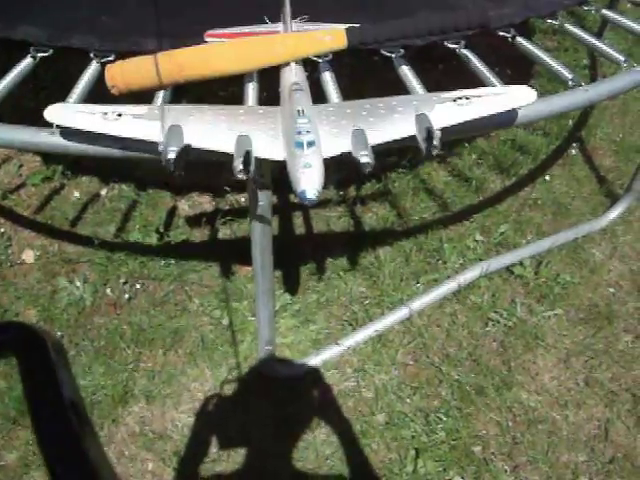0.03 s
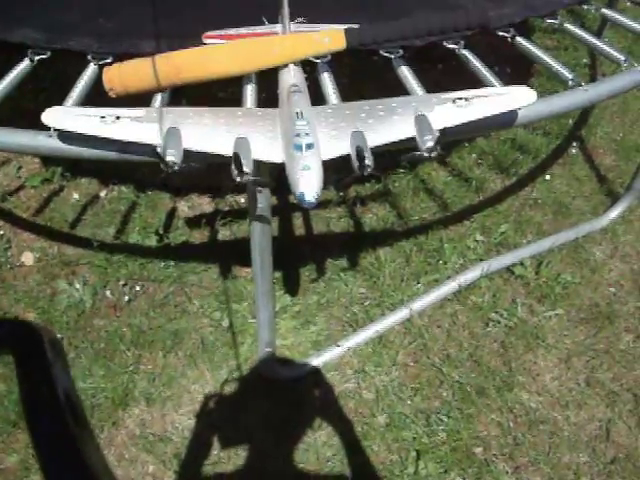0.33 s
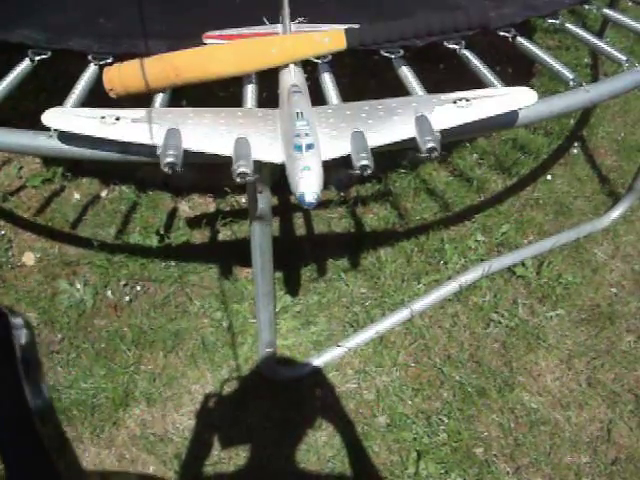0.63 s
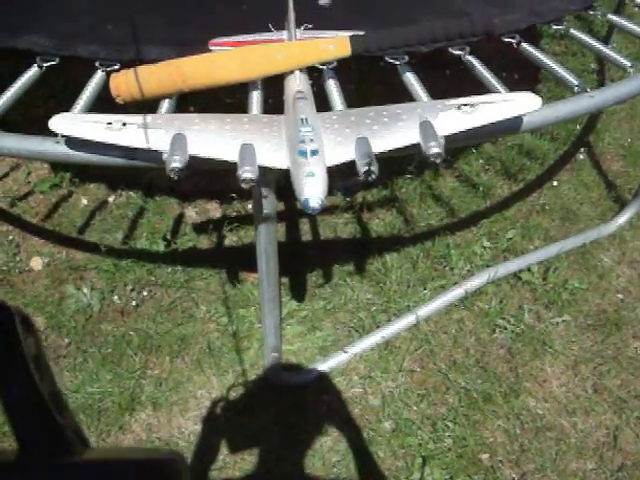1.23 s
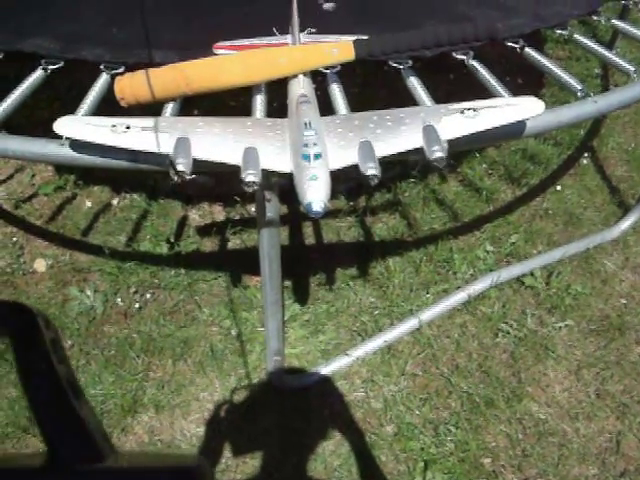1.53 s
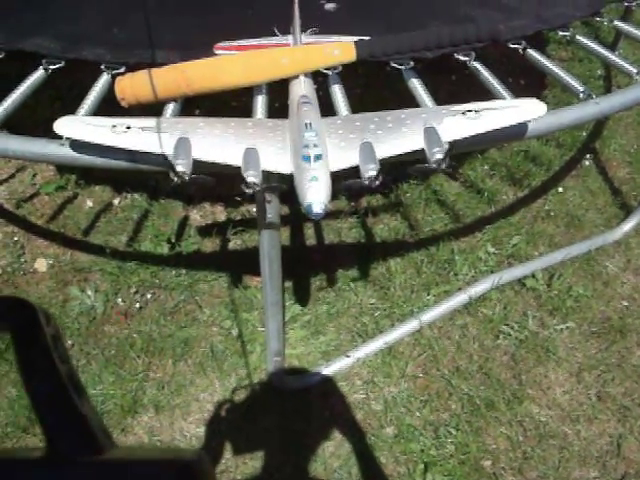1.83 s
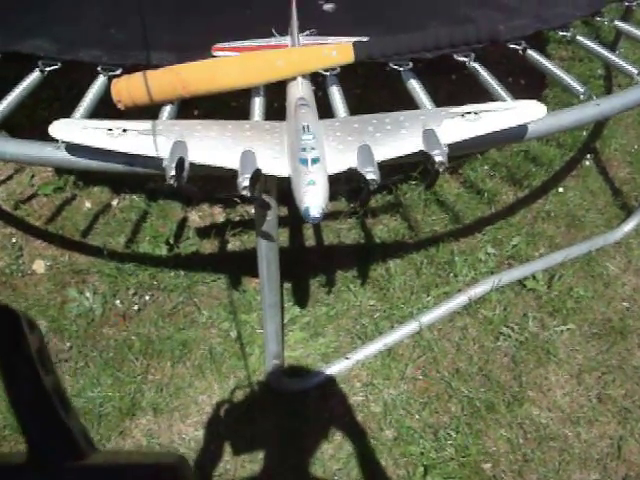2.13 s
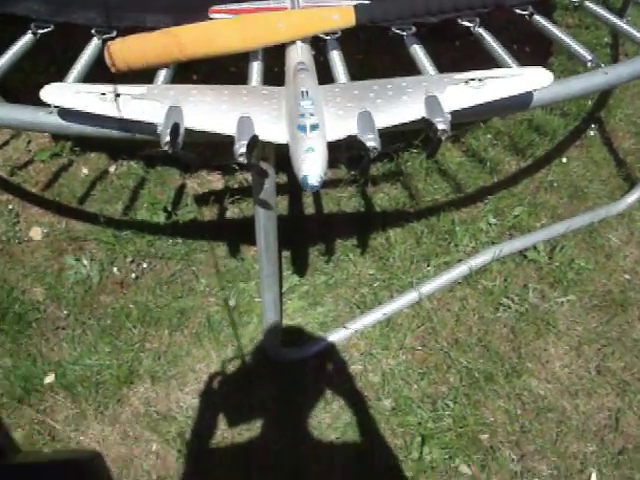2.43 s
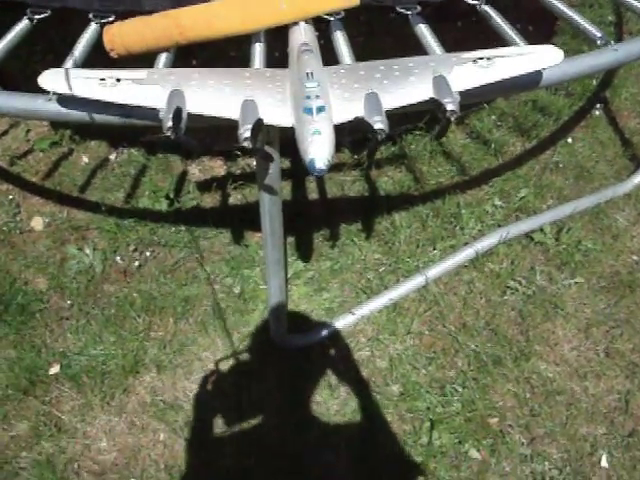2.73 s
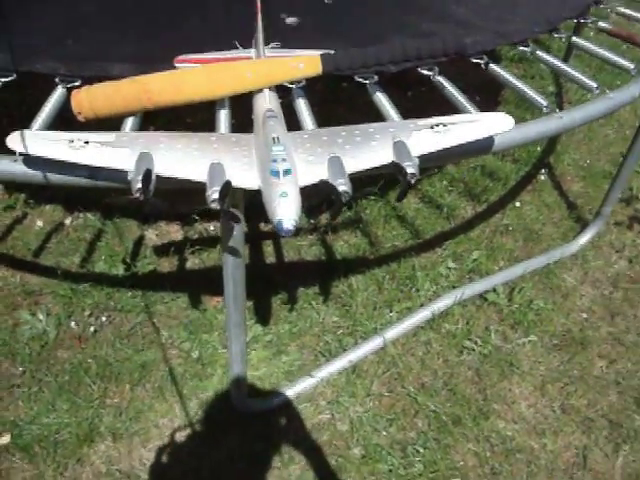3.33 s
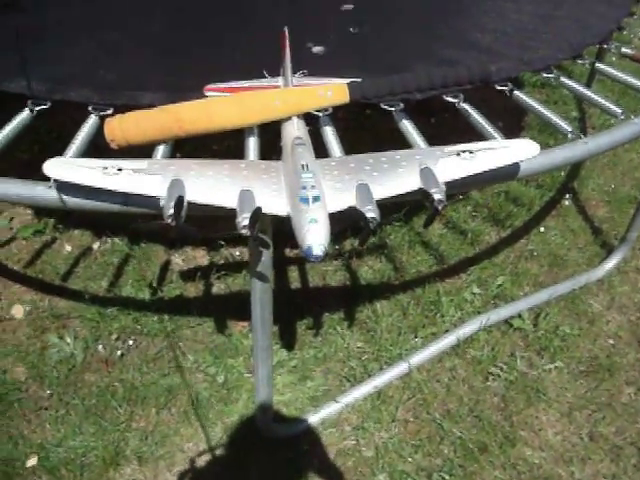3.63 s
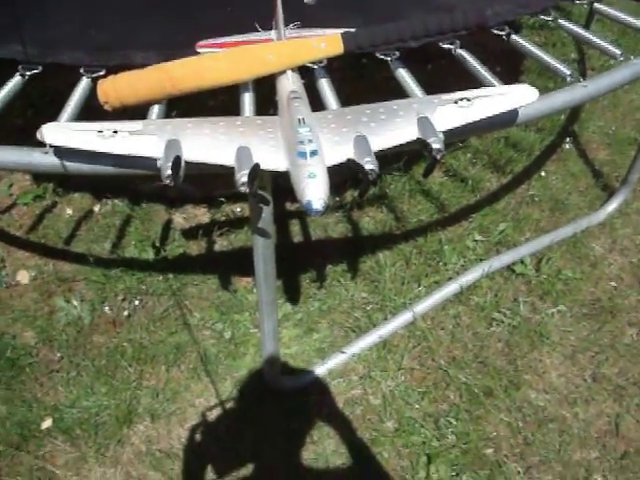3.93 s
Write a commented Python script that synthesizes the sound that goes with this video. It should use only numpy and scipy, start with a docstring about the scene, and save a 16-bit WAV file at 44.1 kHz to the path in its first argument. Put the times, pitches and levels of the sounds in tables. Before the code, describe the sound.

Small model plane motors rev once with a rattling whine and fade; a plastic knock follows.

```python
"""A garden, with a model plane resting on a trampoline. An earlier spin dies away, then one blip of
throttle spins up its four geared electric motors. The gears whine and coast down while the loose
propeller shafts rattle the airframe and the hollow wings drone. A far engine climbs in pitch under the
outdoor rumble. Something plastic clicks in the hand, scuffs and knocks close to the microphone."""
import sys
import numpy as np
from scipy import signal
from scipy.fft import rfft, irfft
from scipy.io import wavfile

SR = 44100
rng = np.random.default_rng(int(sys.argv[2]) if len(sys.argv) > 2 else 0)


def generate_wav(sig):
    """Save sig (samples, or channels by samples) to the path in sys.argv[1] as 16-bit PCM at SR."""
    pcm = np.round(np.clip(np.atleast_2d(sig).T, -1, 1) * 32767).astype(np.int16)
    wavfile.write(sys.argv[1], SR, pcm)


N = 176400
TIME = np.arange(N) / SR


def from_db(db):
    """Decibels to gain."""
    return 10 ** (np.asarray(db) / 20)


def unit_rms(x):
    """Scale to rms 1."""
    return x / np.sqrt(np.mean(x ** 2) + 1e-20)


def curves(rows):
    """Each column after the time column, interpolated to every sample."""
    times_s, *columns = np.transpose(rows)
    return [np.interp(TIME, times_s, column) for column in columns]


def drift(corner_hz):
    """Low-passed random motion, rms 1."""
    step = 20
    pole = np.exp(-2 * np.pi * corner_hz * step / SR)
    slow = signal.lfilter([1], [1, -2 * pole, pole * pole], rng.standard_normal(N // step + 2002))[2000:]
    return np.interp(np.arange(N) / step, np.arange(len(slow)), unit_rms(slow))


def coloured_noise(spectrum):
    """Noise with the given spectral shape, rms 1."""
    hz, db = np.transpose(spectrum)
    bins_hz = np.maximum(np.arange(N // 2 + 1) * SR / N, 1)
    gain = from_db(np.interp(np.log(bins_hz), np.log(hz), db))
    return unit_rms(irfft(rfft(rng.standard_normal(N)) * gain, N))


def resonate(x, hz, width_hz):
    """Two-pole band-pass, peak gain 1."""
    r = np.exp(-np.pi * width_hz / SR)
    poles = [1, -2 * r * np.cos(2 * np.pi * hz / SR), r * r]
    return signal.lfilter(np.array([1, 0, -1]) * (1 - r * r) / 2, poles, x)


def ring(x, hz, t60_s):
    """One mode: a unit impulse starts a decaying sine of height 1."""
    r, w = np.exp(-np.log(1000) / (t60_s * SR)), 2 * np.pi * hz / SR
    return signal.lfilter([0, np.sin(w)], [1, -2 * r * np.cos(w), r * r], x + 1e-18)


def decay(start_s, tau_s):
    """Instant onset, exponential fall."""
    return (TIME >= start_s) * np.exp(-np.minimum(abs(TIME - start_s) / tau_s, 50))


def phase(hz):
    """Running phase in radians."""
    return 2 * np.pi * np.cumsum(hz) / SR


# Each row: frequency in Hz, relative noise density in dB.
AIR_SPECTRUM = [(25, 4), (40, -4.5), (70, -4), (105, -9.5), (160, -11), (243, -12.5), (380, -9),
                (460, -11.5), (600, -10), (690, -11.5), (850, -5), (1030, -6.5), (1330, -18), (1650, -19),
                (1900, -23.5), (2450, -23.5), (3100, -28.5), (4300, -29), (5600, -33)]
AIR_DB, AIR_SWELL_DB = -39, .46


def outdoor_air():
    """Near-steady rumble and hiss."""
    return coloured_noise(AIR_SPECTRUM) * from_db(AIR_DB + AIR_SWELL_DB * drift(2.8))


# Each row: time in seconds, firing rate in Hz, level in dB.
ENGINE_CURVE = [(0, 36, -62), (.9, 45, -52), (1.45, 53, -56), (1.88, 61, -47.5), (2.15, 65, -56),
                (2.6, 74, -57), (2.9, 79, -50), (3.25, 87, -49), (3.5, 89, -61), (4, 96, -58)]
# Each row: multiple of the firing rate, relative level in dB.
ENGINE_HARMONICS = [(1, 0), (2, -4), (3, -10)]


def far_engine():
    """A distant engine gathers speed; each firing harmonic wavers in level."""
    hz, db = curves(ENGINE_CURVE)
    firing = phase(hz * (1 + .015 * drift(8)))
    return sum(from_db(db + harmonic_db + 2 * drift(1.6)) * np.sin(k * firing)
               for k, harmonic_db in ENGINE_HARMONICS)


THROTTLE_ON_S, THROTTLE_OFF_S, THROTTLE_FADE_S = .5, .9, .08


def coasting():
    """0 under power, 1 with the throttle closed."""
    return np.clip((TIME - THROTTLE_OFF_S) / THROTTLE_FADE_S, 0, 1) + (TIME < THROTTLE_ON_S)


# Each row: time in seconds, shaft speed in turns per second.
SHAFT_SPEED = [(0, 24), (.4, 10), (.545, 12), (.62, 29), (.65, 38), (.667, 51), (.70, 68), (.73, 85),
               (.78, 100), (.83, 111), (.87, 109), (.92, 94), (.96, 86), (1.05, 64), (1.11, 59), (1.2, 48),
               (1.35, 33), (1.6, 21), (2.1, 9)]
SLAP_SHARPNESS, LOADED_SHARE, SLAP_SPREAD_DB = .8, .3, 1.6


def shaft_motion():
    """Speed and slap envelope (rms about 1): a loose shaft slaps once a turn, most when unloaded."""
    shaft_hz, = curves(SHAFT_SPEED)
    turn = phase(shaft_hz * (1 + .11 * drift(30)))
    depth = SLAP_SHARPNESS * (LOADED_SHARE + (1 - LOADED_SHARE) * coasting())
    pulses = np.exp(depth * np.cos(turn)) / np.sqrt(np.i0(2 * depth))
    return shaft_hz, pulses * from_db(SLAP_SPREAD_DB * drift(40))


# Each row: time in seconds, level in dB before the speed tilt.
RATTLE_ENVELOPE = [(0, -41.5), (.18, -60), (.38, -77), (.535, -57.5), (.56, -37), (.61, -34), (.655, -26.5),
                   (.70, -32.5), (.78, -30.5), (.88, -27.5), (.97, -28.5), (1.15, -30), (1.3, -33.5),
                   (1.5, -40.5), (1.75, -47), (2.1, -61), (2.4, -89)]
# Each row: resonance in Hz, width in Hz, relative gain in dB.
AIRFRAME_MODES = [(180, 180, -15.5), (431, 50, -4), (602, 43, -5), (867, 55, 5.5), (1116, 97, 2),
                  (1260, 69, -1.5), (1422, 54, 0.5), (1689, 140, -2), (2270, 130, -11), (2830, 310, -6.5),
                  (3590, 170, -4), (3996, 346, -4.5), (5070, 370, -12), (5550, 820, -17)]
CONTACTS_PER_S, CONTACT_SPREAD_DB = 5000, 1.5
GRIND_DB, GRIND_CORNER_HZ = -2, 2200
TILT_DB_PER_OCTAVE, TILT_PIVOT_HZ, FLAT_SHAFT_HZ = 1.5, 1200, 68.4  # tilt per doubling of speed


def shaft_rattle(shaft_hz, slaps):
    """Tiny contacts bunched into slaps, plus an even grind, ring the airframe; duller at low speed."""
    contacts = (rng.random(N) < CONTACTS_PER_S / SR) * rng.choice([-1, 1], N)
    strength = from_db(CONTACT_SPREAD_DB * rng.standard_normal(N))
    chatter = unit_rms(contacts * strength * slaps)
    grind = from_db(GRIND_DB) * rng.standard_normal(N)
    doublings = np.log2(np.maximum(shaft_hz, 20) / FLAT_SHAFT_HZ)
    flat, tilted = 0, 0
    for k, (hz, width_hz, db) in enumerate(AIRFRAME_MODES):
        force = chatter + grind * min(GRIND_CORNER_HZ / hz, 1)
        mode = (-1) ** k * from_db(db) * resonate(force, hz, width_hz)
        flat += mode
        tilted += mode * from_db(TILT_DB_PER_OCTAVE * doublings * np.log2(hz / TILT_PIVOT_HZ))
    return tilted / np.std(flat) * from_db(curves(RATTLE_ENVELOPE)[0])


# Each row: time in seconds, level in dB.
DRONE_ENVELOPE = [(0, -45), (.18, -43.5), (.36, -64), (.53, -61), (.58, -39), (.68, -57), (.85, -38.5),
                  (1.05, -46), (1.22, -43), (1.45, -49), (1.65, -43), (1.85, -50.5), (2.2, -81)]
DRONE_HZ, DRONE_WIDTH_HZ = 369.5, 120


def wing_drone():
    """The hollow wings hum: noise passed twice through one resonance."""
    band = resonate(rng.standard_normal(N), DRONE_HZ, DRONE_WIDTH_HZ)
    hum = resonate(band, DRONE_HZ, DRONE_WIDTH_HZ)
    return unit_rms(hum) * from_db(curves(DRONE_ENVELOPE)[0])


# Each row: one motor's ratio to the shaft speed, relative level in dB.
MOTOR_MIX = [(1.0, 0), (.96, -5), (1.045, -7), (.89, -12)]
# Each row: multiple of the turning rate, level in dB at full speed.
BLADE_HARMONICS = [(1, -46), (3, -40.5), (4, -42), (7, -44.5), (8, -38.5)]
BLADE_EXPONENT, COASTING_DB = 1.3, -9


def propellers(shaft_hz):
    """Low blade tones grow with speed; the blades bite less with the throttle closed."""
    tones = 0
    for ratio, motor_db in MOTOR_MIX:
        turn = phase(shaft_hz * ratio * (1 + .015 * drift(25)))
        tones += sum(from_db(db + motor_db) * np.sin(k * turn) for k, db in BLADE_HARMONICS)
    return tones * (shaft_hz / shaft_hz.max()) ** BLADE_EXPONENT * from_db(COASTING_DB * coasting())


# Each row: time in seconds, tooth tone level in dB, level of its octave in dB.
WHINE_ENVELOPES = [(.56, -75, -75), (.64, -35, -48), (.69, -36, -39), (.73, -29, -42), (.80, -32, -60),
                   (.87, -35.5, -60), (.95, -32.5, -46), (1.01, -44, -45), (1.07, -46, -34),
                   (1.12, -48, -40), (1.17, -52, -52), (1.6, -80, -80)]
GEAR_TEETH, PITCH_WAVER, FLUTTER_DB = 32, .026, 2.5


def gear_whine(shaft_hz, slaps):
    """Each gear pair sings unsteadily at its tooth rate and the octave, pulsing with the shaft."""
    tooth, octave = 0, 0
    for ratio, motor_db in MOTOR_MIX:
        mesh = GEAR_TEETH * phase(shaft_hz * ratio * (1 + PITCH_WAVER * drift(140)))
        grip = from_db(motor_db + FLUTTER_DB * drift(100))
        tooth += grip * np.sin(mesh)
        octave += grip * np.sin(2 * mesh)
    tooth_db, octave_db = curves(WHINE_ENVELOPES)
    return slaps * (unit_rms(tooth) * from_db(tooth_db) + unit_rms(octave) * from_db(octave_db))


# Each row: start in seconds, relative level in dB.
CLICK_EVENTS = [(2.6657, -36), (2.845, -35), (2.8587, -24), (2.8767, -24), (3.1331, -41), (3.7472, -31)]
# Each row: frequency in Hz, relative noise density in dB.
CLICK_SPECTRUM = [(150, -34.5), (230, 4), (500, -10), (1400, 10.5), (2000, 4.5), (3000, 0.5), (5500, -11)]
CLICK_DECAY_S = .0044


def hand_clicks():
    """Plastic clicks in the hand: short bursts of noise."""
    envelope = sum(from_db(db) * decay(start_s, CLICK_DECAY_S) for start_s, db in CLICK_EVENTS)
    return .5 * coloured_noise(CLICK_SPECTRUM) * envelope


# Each row: time in seconds, level in dB.
SCUFF_ENVELOPE = [(3.19, -90.5), (3.196, -32), (3.206, -45), (3.214, -29.5), (3.223, -49.5), (3.227, -8.5),
                  (3.232, -17.5), (3.24, -87)]
# Each row: frequency in Hz, relative noise density in dB.
SCUFF_SPECTRUM = [(100, -8), (300, -11), (700, 0), (1300, -7), (2000, -8), (3000, -2), (3700, -6),
                  (4300, -15), (5500, -17)]


def scuff():
    """Plastic scuffs along into the hard knock."""
    return coloured_noise(SCUFF_SPECTRUM) * from_db(curves(SCUFF_ENVELOPE)[0])


# Each row: start in seconds, relative level in dB, contact softness in seconds.
KNOCK_EVENTS = [(3.198, -10, .0005), (3.2278, 1.5, .00002), (3.22943, -3.5, .00002)]
# Each row: frequency in Hz, relative gain in dB, T60 in seconds.
CASE_MODES = [(529, -9.5, 0.015), (664, -15, 0.045), (968, -10, 0.038), (1452, -6, 0.017),
              (1834, -6.5, 0.0081), (2350, -16.5, 0.0062), (3080, -12.5, 0.0069), (3530, -33, 0.003),
              (4400, -14, 0.0053), (4880, -22.5, 0.005), (840, -28, 0.1), (1810, -37, 0.13)]
TAIL_DB, TAIL_DECAY_S, CASE_LOW_HZ = -47, .025, 300


def knock():
    """A soft touch, then a hard blow and rebound, ring a small plastic case; each has a noisy tail."""
    force, tail = 0, 0
    for start_s, db, soft_s in KNOCK_EVENTS:
        push = decay(start_s, soft_s / 2) * np.clip(TIME - start_s, 0, 20 * soft_s)
        force += from_db(db) * push / push.sum()
        tail += from_db(db + TAIL_DB) * decay(start_s, TAIL_DECAY_S)
    body = sum((-1) ** k * from_db(db) * ring(force, hz, t60_s)
               for k, (hz, db, t60_s) in enumerate(CASE_MODES))
    # A small case radiates little bass.
    body = signal.sosfilt(signal.butter(2, CASE_LOW_HZ, "high", fs=SR, output="sos"), body)
    return body + tail * unit_rms(resonate(rng.standard_normal(N), hz=1100, width_hz=2600))


def scene():
    """Garden, plane and hand, in mono."""
    garden = outdoor_air() + far_engine()
    shaft_hz, slaps = shaft_motion()
    airframe = shaft_rattle(shaft_hz, slaps) + wing_drone()
    drive = propellers(shaft_hz) + gear_whine(shaft_hz, slaps)
    hand = hand_clicks() + scuff() + knock()
    return (garden + airframe + drive + hand)[None]


MIC_LOW_HZ, MIC_TOP_HZ, OUTPUT_TOP_HZ = 22, 5557, 17000
CEILING, KNEE_EXPONENT = .72, 24


def record(dry):
    """A narrow-band microphone channel; the knock overloads it."""
    narrow = signal.sosfilt(signal.butter(30, MIC_TOP_HZ, fs=SR, output="sos"), dry)
    narrow = signal.sosfilt(signal.butter(4, MIC_LOW_HZ, "high", fs=SR, output="sos"), narrow)
    limited = narrow / (1 + abs(narrow / CEILING) ** KNEE_EXPONENT) ** (1 / KNEE_EXPONENT)
    return signal.sosfilt(signal.cheby2(12, 70, OUTPUT_TOP_HZ, fs=SR, output="sos"), limited)


dry = scene()
out = record(dry)
generate_wav(out)
```